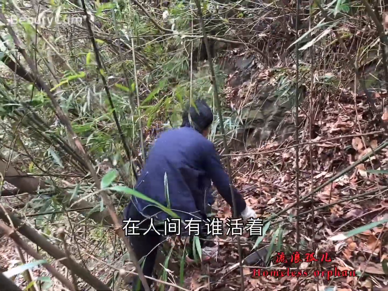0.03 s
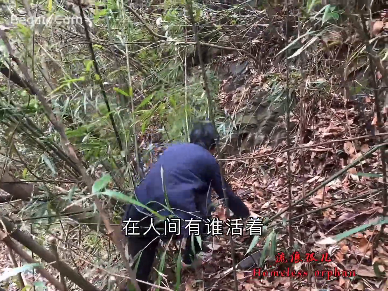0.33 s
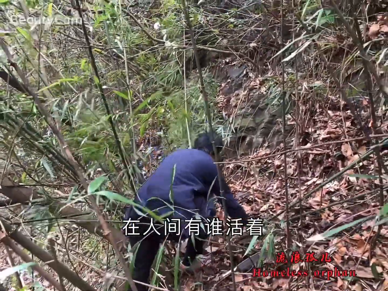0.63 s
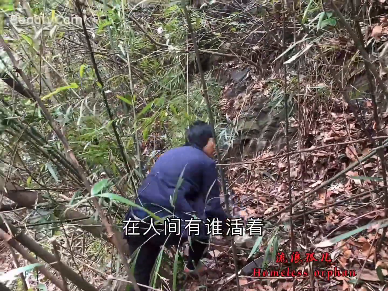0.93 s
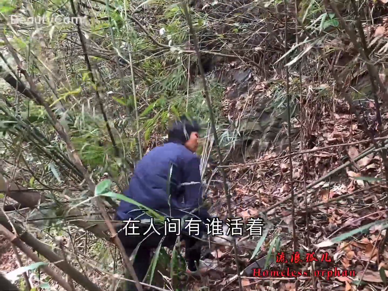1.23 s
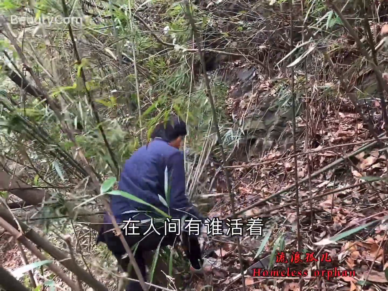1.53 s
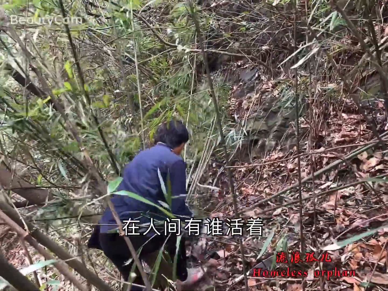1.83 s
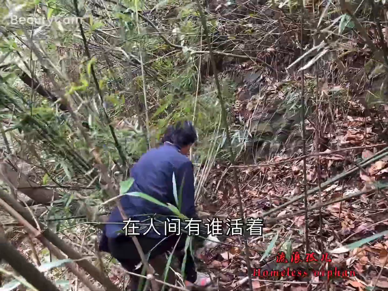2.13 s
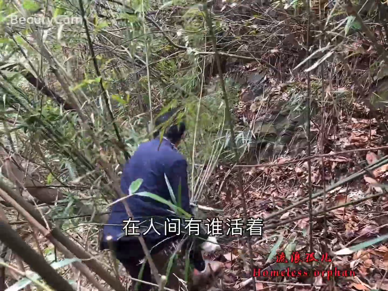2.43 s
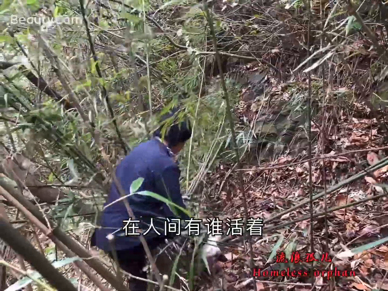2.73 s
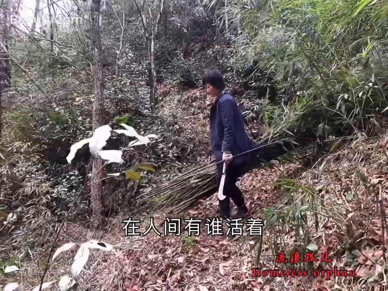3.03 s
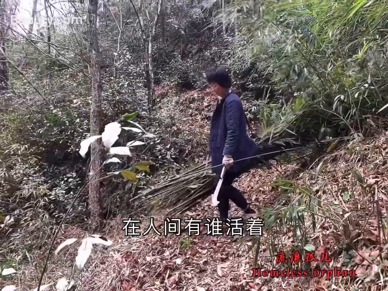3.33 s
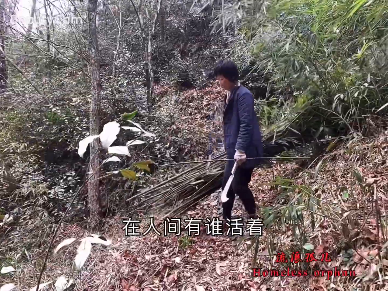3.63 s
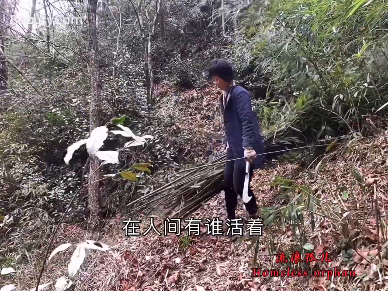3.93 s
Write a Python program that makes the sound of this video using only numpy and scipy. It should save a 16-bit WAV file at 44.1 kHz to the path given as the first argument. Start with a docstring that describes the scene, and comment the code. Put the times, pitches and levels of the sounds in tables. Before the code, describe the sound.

Dry bamboo stalks crack and tear from about 0.7 seconds, after a soft bump, loudest just before 1 second and again near 1.5 and 2. Leaves rustle and twigs tick over outdoor air and a low hum. Near 2.8 seconds everything but the hum dips briefly. Then a bundle drags over dead leaves until 4 seconds, with soft footfalls and more twig snaps, while the hum fades.

```python
"""Open air and a low hum lie under a bamboo thicket on a wooded slope. After a soft bump, someone
pulls at the dry stalks: they crack and tear, the leaves rustle, thin twigs tick. Near 2.8 s all but
the hum dips briefly. Then a bundle of stalks is dragged over dead leaves, with soft footfalls and a
few more twigs, while the hum fades. Nearly mono throughout, with a dull top."""
import sys
import numpy as np
from scipy import signal
from scipy.fft import rfft, irfft
from scipy.io import wavfile
from scipy.ndimage import uniform_filter1d

SR = 44100
rng = np.random.default_rng(int(sys.argv[2]) if len(sys.argv) > 2 else 0)


def wav_out(sig):
    """Save sig, one row per channel (or a flat mono array), as 16-bit PCM at SR to the path in sys.argv[1]."""
    wavfile.write(sys.argv[1], SR, np.round(np.clip(np.atleast_2d(sig).T, -1, 1) * 32767).astype(np.int16))


N = 176400

# EQ of the snap: f/Hz, level/dB
SNAP_EQ = [(150, -24), (600, -14), (1000, -13), (1450, -7), (2200, -10.5), (2900, -3.5), (4400, -1),
           (5600, 1), (7700, -3.5), (10000, -11)]
# Modes of the hollow stalk: f/Hz, level/dB, t60/s
STALK_MODES = [(730, -43, 0.021), (1286, -30, 0.031), (1630, -32, 0.038), (2850, -39, 0.012),
               (4000, -48, 0.0097), (5600, -42, .014), (7770, -24, 0.041)]
# EQ of the echoes off the stalks around: f/Hz, level/dB
ECHO_EQ = [(300, -6), (1500, -2.5), (5000, -2.5), (8300, 7), (10000, 4)]
# Crack cues: t/s, level/dB, tilt/(dB per octave), tail trim/dB, ring trim/dB, bend trim/dB, bend end f/Hz
CRACK_CUES = [(.686, -16, 2.5, 5.5, 3, 5.5, 426), (0.7368, -16.5, 6, 1.5, 2, 4, 404),
              (0.8416, -20, 2, 8, -5, -10, 800), (0.9123, -26.5, 0, 9.5, -6, -5, 1510),
              (0.9478, -1.5, -1, -2, -3, -6, 1150), (1.5273, -16.5, -4.5, 1, -4, 1.5, 350),
              (1.986, -28, -5, -11, 8, 9, 895), (2.0429, -22.5, 2, 12, 12, 6, 1160)]


def cracks():
    """A stalk breaks: one sharp pulse, then splinters, a bending wave, a hollow ring and faint echoes."""
    out, echo_env = np.zeros((2, N))
    splinters = grains(25000, spread_db=2.0)
    for start, db, tilt, tail_db, ring_db, bend_db, bend_hz in CRACK_CUES:
        snap = undb(db + tail_db - 17) * burst(start, attack=.0001, decay=.0018) * splinters
        snap[int(start * SR)] -= undb(db + 5)  # the pulse of the fracture
        out += eq(snap, [(hz, level + tilt * np.log2(hz / 4000)) for hz, level in SNAP_EQ])
        out += undb(db + bend_db - 18.5) * bending_wave(start, bend_hz)
        for hz, mode_db, t60 in STALK_MODES:
            detune = 1 + .02 * rng.standard_normal()
            out += undb(db + ring_db + mode_db) * ring(start, hz * detune, t60)
        echo_env += undb(db + tail_db - 28.5) * burst(start, attack=.00092, decay=.016)
    return out + eq(echo_env * rng.standard_normal(N), ECHO_EQ)


def bending_wave(start, end_hz):
    """Highs travel faster along a stalk and arrive first: a quick downward chirp."""
    start_hz, glide_s, decay_s = 3280, .000793, .0024
    t = since(start)
    cycles = end_hz * t + (start_hz - end_hz) * glide_s * (1 - np.exp(-t / glide_s))
    return np.sin(2 * np.pi * cycles) * np.exp(-np.minimum(t / decay_s, 20))


# EQ of the rip: f/Hz, level/dB
TEAR_EQ = [(200, -9), (900, -8.5), (2400, -2), (5000, 0.5), (8500, 0.5), (10000, -1)]
# Fibre rips and leaf swipes: t/s, level/dB, attack/s, decay/s
TEAR_CUES = [(0.851, -34.5, 0.0013, .006), (0.9, -37, 0.0016, 0.0093), (1.242, -29, 0.0048, 0.034),
             (1.525, -32.5, 0.0022, 0.029), (2.05, -42, 0.0027, 0.0027), (2.634, -37.5, 0.0042, 0.019),
             (3.365, -43, 0.016, 0.018), (3.63, -41, 0.0054, 0.013)]


def tears():
    """Runs of fibres give way in a dense crackle."""
    env = sum(undb(db) * burst(start, attack, decay) for start, db, attack, decay in TEAR_CUES)
    return env * unit(eq(grains(14000, spread_db=1.5), TEAR_EQ))


# Twig ticks: t/s, level/dB, f/Hz, crackle decay/s
TWIG_CUES = [(1.535, -21, 2370, .005), (1.826, -20, 2100, 0.0078), (2.0048, -17.5, 3700, .005),
             (2.2225, -24, 3920, .001), (2.5981, -7, 3870, 0.00042), (2.8905, -10, 1620, 0.0012),
             (3.1975, -20, 8100, 0.0011), (3.242, -17, 5350, .0006)]


def twigs():
    """Thin twigs snap: a click and a brief crackle excite one broad resonance."""
    width_octaves = .58
    out = np.zeros(N)
    for start, db, hz, decay in TWIG_CUES:
        snap = undb(-9) * burst(start, attack=.0001, decay=decay) * rng.standard_normal(N)
        snap[int(start * SR)] += 1  # the click
        edges = hz * 2 ** (width_octaves * np.array([-.5, .5]))
        resonance = signal.butter(2, edges, "bandpass", fs=SR, output="sos")
        out += undb(db) * signal.sosfilt(resonance, snap + 1e-18)
    return out


# EQ of the foliage: f/Hz, level/dB
RUSTLE_EQ = [(200, -15.5), (700, 0.5), (1500, -0.5), (3500, 0.5), (5500, 1), (8200, 4), (10000, 0)]
# Fader ride of the foliage: t/s, level/dB
RUSTLE_RIDE = [(0, -80), (.6, -57), (.82, -51), (.93, -50), (1.03, -44.5), (1.2, -44), (1.48, -43.5),
               (1.6, -42.5), (1.95, -41.5), (2.2, -47.5), (2.55, -49.5), (2.68, -44), (2.76, -53),
               (2.8, -71)]


def thicket():
    """Countless leaves brush each other as the stalks are pulled."""
    leaves = grains(16000, spread_db=1.5) * undb(.5 * drift(25.76))
    return fader(RUSTLE_RIDE) * unit(eq(leaves, RUSTLE_EQ))


# EQ of the dead-leaf crunch: f/Hz, level/dB
CRUNCH_EQ = [(300, -7), (1500, 1.5), (3000, 2), (5000, 0.5), (8500, 0.5), (10000, -2.5)]
# Fader ride of the crunch: t/s, level/dB
CRUNCH_RIDE = [(2.78, -61), (2.835, -41.5), (2.98, -41.5), (3.1, -46.5), (3.22, -43.5), (3.33, -46),
               (3.4, -42.5), (3.46, -48.5), (3.62, -44.5), (3.8, -47), (4, -47.5)]
# EQ of the stalks scraping the ground: f/Hz, level/dB
SCRAPE_EQ = [(50, -4), (130, -2.5), (290, 3), (420, -1), (560, -6.5), (850, -5), (1300, -1.5), (2200, -10),
             (5000, -22.5)]
# Fader ride of the scrape: t/s, level/dB
SCRAPE_RIDE = [(2.78, -75), (2.84, -45.5), (3.02, -45.5), (3.15, -45.5), (3.38, -45.5), (3.46, -45.5),
               (3.56, -46), (3.72, -47), (4, -44.5)]


def bundle():
    """Dragged stalks crush dead leaves and scrape the ground."""
    crunch = unit(eq(grains(12000, spread_db=2.5), CRUNCH_EQ)) * undb(.37 * drift(30))
    scrape = unit(eq(grains(3000, spread_db=2.0), SCRAPE_EQ)) * undb(.23 * drift(21.7))
    return fader(CRUNCH_RIDE) * crunch + fader(SCRAPE_RIDE) * scrape


# Footfalls and knocks of the bundle: t/s, level/dB, f/Hz, t60/s, scuff trim/dB
THUD_CUES = [(.368, -39, 170, 0.056, -8), (3, -41, 240, 0.041, -9), (3.032, -33.5, 227, 0.045, -4),
             (3.314, -36.5, 369, 0.044, -9), (3.376, -36, 340, 0.047, -5), (3.394, -38, 380, 0.061, -9),
             (3.532, -30.5, 128, 0.056, -2.5)]


def thuds():
    """Dull bumps on soft ground, each led in by a short scuff."""
    scuff_eq = [(80, -8.5), (350, -1), (1000, -5), (2500, -22), (9000, -26)]  # f/Hz, level/dB
    dull_noise = shaped_noise(scuff_eq)
    out = np.zeros(N)
    for start, db, hz, t60, scuff_db in THUD_CUES:
        scuff = undb(scuff_db) * dull_noise * burst(start - .0025, attack=.00093, decay=.004)
        out += undb(db) * (ring(start, hz, t60) + scuff)
    return out


# EQ of the air bed: f/Hz, level/dB
AIR_EQ = [(20, -16), (40, -1), (65, 6.5), (110, 3.5), (220, 0.5), (330, 2), (520, -0.5), (900, 1),
          (1800, -3), (4000, -9), (9500, -17)]


def air():
    """Steady wash of the open slope."""
    return undb(-49.5 + .22 * drift(7.9)) * shaped_noise(AIR_EQ)


# First three harmonics of the hum: level/dB
HUM_HARMONICS = [-59, -50, -56.5]
# Fader ride of the hum: t/s, level/dB
HUM_RIDE = [(0, 3.5), (.55, -1.5), (1.25, -3), (1.65, -1.5), (2.2, -0.5), (2.75, -2.5), (3.15, -1.5),
            (3.5, -7), (4, -22)]


def hum():
    """A low hum that wavers in pitch, each harmonic fluttering on its own."""
    pitch_hz, wander, flutter_db = 57.88, .0039, .85
    phase = 2 * np.pi * np.cumsum(pitch_hz * (1 + wander * drift(7.05))) / SR
    tone = np.zeros(N)
    for k, db in enumerate(HUM_HARMONICS, 1):
        tone += undb(db + flutter_db * drift(8.97)) * np.sin(k * phase + 2 * np.pi * rng.random())
    return np.sqrt(2) * tone * fader(HUM_RIDE)


# EQ of the air in the side channel: f/Hz, level/dB
WIDTH_EQ = [(20, -23.5), (60, 4.5), (120, 10), (250, -8), (500, -28), (1000, -58.5)]


def air_width():
    """Faint low air that differs between the ears."""
    return undb(-69.5) * shaped_noise(WIDTH_EQ)


def undb(db):
    """Decibels to gain."""
    return 10 ** (np.asarray(db) / 20)


def unit(x):
    """Scale to rms 1."""
    return x / np.sqrt(np.mean(x ** 2))


def fader(ride):
    """Gain over time through points of t/s, level/dB."""
    return undb(np.interp(np.arange(N) / SR, *np.array(ride).T))


def eq(x, points):
    """Minimum-phase EQ through points of f/Hz, level/dB."""
    size = 8192
    hz, db = np.array(points).T
    freqs = np.maximum(np.arange(size // 2 + 1) * SR / size, 1)
    gain = undb(np.interp(np.log(freqs), np.log(hz), db))
    cepstrum = irfft(np.log(gain))
    cepstrum[1:size // 2] *= 2  # fold onto positive time: no ringing ahead of a hit
    cepstrum[size // 2 + 1:] = 0
    impulse = irfft(np.exp(rfft(cepstrum)))
    return signal.fftconvolve(x, impulse)[:len(x)]


def shaped_noise(points):
    """White noise through an EQ, rms 1."""
    return unit(eq(rng.standard_normal(N), points))


def drift(rate_hz):
    """Smooth random modulation, rms 1."""
    hold = int(SR / rate_hz)
    steps = np.repeat(rng.standard_normal(N // hold + 2), hold)
    return unit(uniform_filter1d(uniform_filter1d(steps, hold), hold)[:N])


def grains(per_second, spread_db):
    """Dense tiny clicks of unequal size, rms 1."""
    size = undb(spread_db * np.minimum(rng.exponential(size=N), 5))
    hits = rng.random(N) < per_second / SR
    return unit(hits * size * rng.choice([-1, 1], N))


def since(start):
    """Seconds since a cue, zero before it."""
    return np.maximum(np.arange(N) - int(start * SR), 0) / SR


def burst(start, attack, decay):
    """Envelope with a linear attack and an exponential decay, times in seconds."""
    t = since(start)
    return np.minimum(t / attack, 1) * np.exp(-np.clip((t - attack) / decay, 0, 20))


def ring(start, hz, t60):
    """One damped mode."""
    t = since(start)
    return np.sin(2 * np.pi * hz * t) * np.exp(-np.minimum(np.log(1000) * t / t60, 20))


# Bus fader, a slight boost with one brief dip: t/s, level/dB
BUS_RIDE = [(2.7, 2.5), (2.745, 0), (2.772, -20), (2.795, -33), (2.812, -6.5), (2.835, 3)]


def scene():
    """Foley and air share a centred bus; the hum and a little low width bypass its fader."""
    bus = cracks() + tears() + twigs() + thuds() + thicket() + bundle() + air()
    mid = bus * fader(BUS_RIDE) + hum()
    side = air_width()
    return np.array([mid + side, mid - side])


def record(dry):
    """A steep high cut dulls the top."""
    cutoff_hz = 9800
    taps = signal.firwin(121, cutoff_hz, window=("kaiser", 7), fs=SR)
    return signal.fftconvolve(dry, taps[None], mode="same", axes=1)


dry = scene()
out = record(dry)
wav_out(out)
```